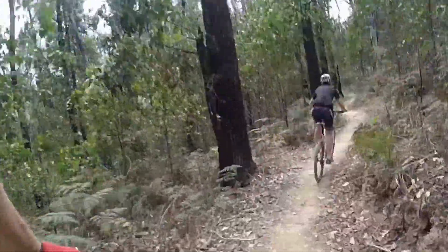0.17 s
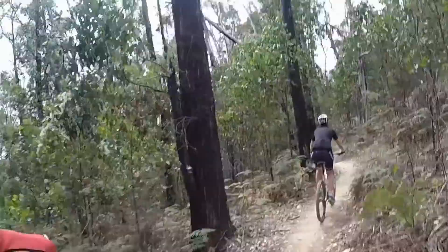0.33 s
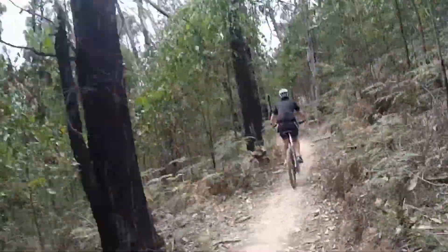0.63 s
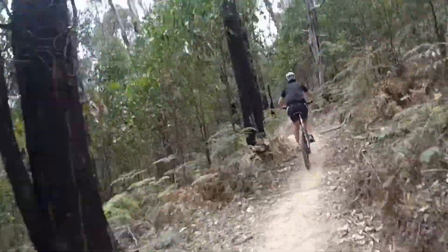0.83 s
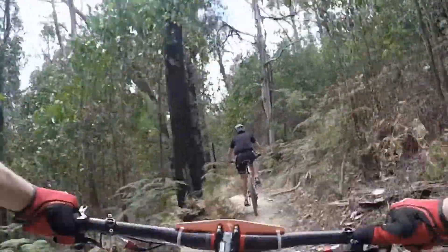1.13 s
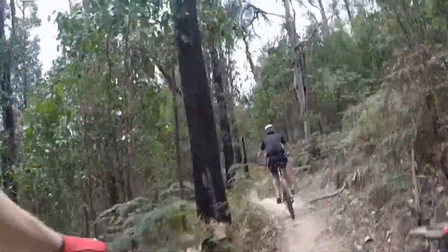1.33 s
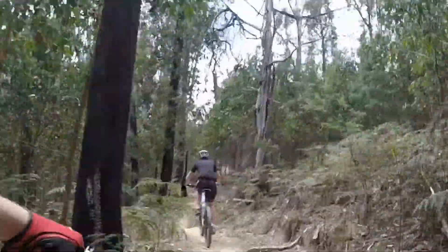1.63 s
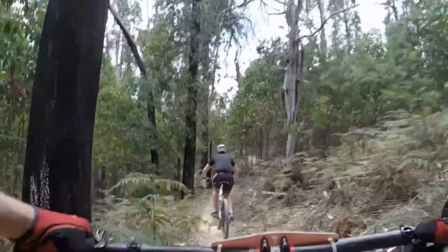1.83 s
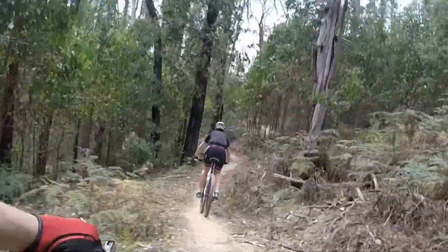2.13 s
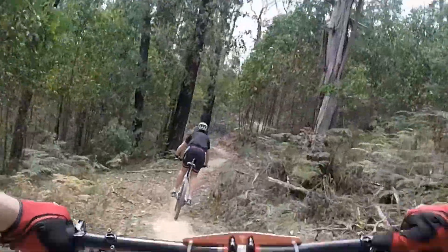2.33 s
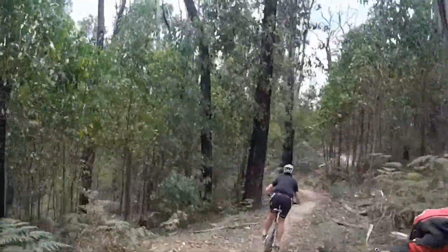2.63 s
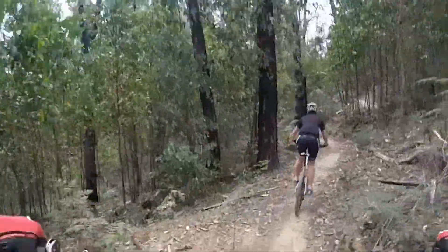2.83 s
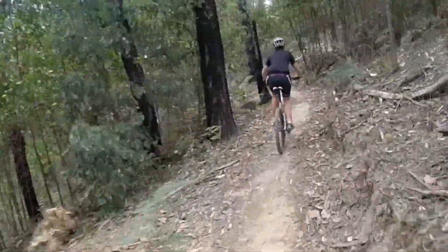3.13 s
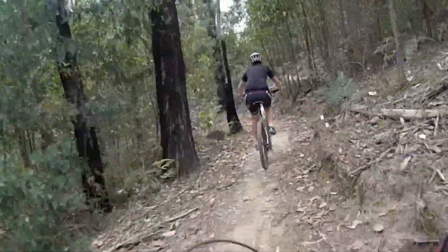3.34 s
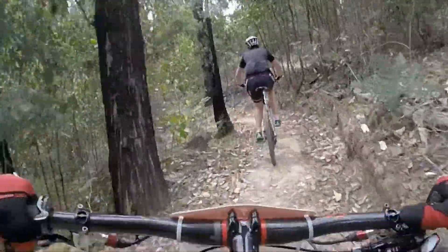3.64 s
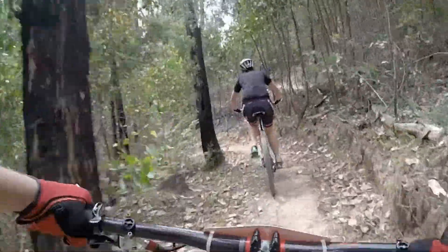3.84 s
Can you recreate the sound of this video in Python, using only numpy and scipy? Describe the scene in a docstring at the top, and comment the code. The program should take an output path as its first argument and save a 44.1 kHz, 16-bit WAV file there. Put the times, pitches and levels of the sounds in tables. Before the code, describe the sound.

A mountain bike rolls over dirt and leaves outdoors, picked up close and boxy by a cased chest microphone. Low shaking and wind rumble run throughout under faint tyre hiss and crackle. Ticks, scrapes and thuds cluster at 0.3-0.8 s; chain whir swells near 1 s, nearly vanishes from 1.6 to 2.8 s. A thump lands at 1.8 s; tyres and rattles surge at 3.3 s, bumps follow near 3.5 s, and the chain returns.

```python
"""The sound inside a case on a rider's chest along a forest trail, built from filtered noise and pulses.
From the start low shaking and the rumble of wind and frame fill the bass; tyres hiss and crackle on dirt and
leaves, the chain whirs and air hisses, these three coloured by the case resonances. Ticks, pressure bumps, strap
scrapes and damped knocks soon join; ticks and scrapes also pass the case resonances. The chain swells near
1 s, almost vanishes from 1.6 s to 2.8 s and returns towards the end, amid strong bumps near 3.5 s."""
import sys
import numpy as np
from scipy import signal
from scipy.fft import rfft, irfft
from scipy.io import wavfile
from scipy.ndimage import uniform_filter1d

SR = 44100
rng = np.random.default_rng(int(sys.argv[2]) if len(sys.argv) > 2 else 0)


def wav_out(sig):
    """Save sig, one row per channel (or a flat mono array), as 16-bit PCM at SR to the path in sys.argv[1]."""
    wavfile.write(sys.argv[1], SR, np.round(np.clip(np.atleast_2d(sig).T, -1, 1) * 32767).astype(np.int16))


def nominal_scale(level):
    """Amplitude ratio for a level in decibels (scalar or array-like)."""
    x = np.asarray(level, float) / 20
    return 10 ** x


N = 174195

# Resonances of the case: f/Hz, width/Hz, level/dB (lift; negative is a dip)
CASE_MODES = [(635, 55, 9.5), (1118, 170, 2.5), (1472, 240, 4.5), (2200, 320, 8), (2850, 205, 6),
              (3260, 270, -5.5), (3600, 293, 11), (4385, 90, 4.5), (5500, 170, 5.5), (6500, 380, 3.5)]
# Shaking, strength over time: t/s, level/dB
SHAKE_LEVEL = [(0, -45.5), (.3, -54), (.55, -49.5), (.75, -49.5), (1.0, -43.5), (1.5, -48), (1.9, -52),
               (2.3, -48), (2.7, -50.5), (3.0, -46), (3.4, -44.5), (3.7, -50.5), (3.95, -55.5)]
# Shaking, shape of spectrum: f/Hz, level/dB
SHAKE_COLOUR = [(3, -25.5), (8, -4), (24, -1), (33, -9.5), (60, -27.5), (100, -39), (1000, -150)]
# Wind and frame rumble, strength over time: t/s, level/dB
RUMBLE_LEVEL = [(0, -65.5), (.25, -64), (.55, -55), (.75, -65), (1.0, -59.5), (1.35, -60), (1.6, -62.5),
                (1.8, -57), (2.1, -65), (2.5, -64.5), (2.8, -62), (3.1, -62.5), (3.3, -55), (3.5, -58.5),
                (3.7, -64.5), (3.95, -62)]
# Wind and frame rumble, shape of spectrum: f/Hz, level/dB
RUMBLE_COLOUR = [(25, 1.5), (50, -8.5), (100, -5.5), (160, -14), (250, -14.5), (330, -25.5), (500, -26),
                 (900, -50), (2000, -76.5), (8000, -130)]
# Tyres on dirt and leaves, strength over time: t/s, level/dB
TYRE_LEVEL = [(0, -73.5), (.2, -70.5), (.45, -69.5), (.7, -71), (.95, -71), (1.2, -69), (1.45, -72.5),
              (1.7, -73.5), (1.85, -67), (2.1, -75.5), (2.3, -71), (2.55, -71), (2.75, -74), (3.0, -73.5),
              (3.3, -64), (3.5, -70), (3.75, -70.5), (3.95, -71.5)]
# Tyres, shape of spectrum before the case: f/Hz, level/dB
TYRE_COLOUR = [(200, -6), (400, -7), (1200, -3), (1600, -2.5), (2800, -5.5), (4000, -14), (5000, -13),
               (7000, -25.5), (7800, -32.5), (10000, -27.5), (14500, -48.5)]
# Chain, strength over time: t/s, level/dB
CHAIN_LEVEL = [(0, -68), (.15, -71), (.45, -72), (.62, -72.5), (.72, -72), (.9, -70), (1.0, -61),
               (1.1, -69), (1.2, -77), (1.6, -85.5), (2.8, -84), (3.0, -73.5), (3.25, -66.5), (3.6, -64.5),
               (3.75, -68.5), (3.95, -65)]
# Chain, shape of spectrum before the resonances: f/Hz, level/dB
CHAIN_COLOUR = [(800, -32), (1500, -21), (2200, -15.5), (2700, -1.5), (3600, -8.5), (5000, -14.5),
                (7000, -17.5), (7800, -29.5), (10000, -26.5), (12000, -20.5), (14500, -60)]
# Resonances of the metal drive: f/Hz, width/Hz, level/dB (lift)
CHAIN_MODES = [(2630, 180, 12), (6750, 350, 4), (8610, 300, 5), (10700, 220, 9), (11500, 160, 10),
               (12450, 300, 6)]
# Airstream hiss, shape of spectrum before the case: f/Hz, level/dB
AIR_COLOUR = [(1000, -13.5), (4000, -3), (7000, -12), (8000, -8.5), (12000, -14), (14500, -20)]
# Ticks of cable and twigs: t/s (start), level/dB (peak before filtering), f/Hz (centre), width/octaves
TICKS = [(.085, -58, 2980, 0.8), (.146, -57.5, 3600, 0.81), (.2718, -53.5, 2030, 1.8),
         (0.296, -51.5, 1850, 0.7), (0.392, -51, 2240, 0.84), (.426, -44.5, 2290, 0.43),
         (.565, -48.5, 3800, 2.4), (.595, -57, 6760, .3), (.663, -54.5, 2960, 1.43),
         (0.699, -51.5, 3380, 2.7), (0.7563, -46, 6450, 1.33), (.758, -57.5, 1920, 0.4),
         (.894, -59.5, 1800, .8), (0.94, -60.5, 1700, 0.68), (1.124, -55, 5400, 1.2),
         (1.291, -61, 7400, 1.4), (1.4445, -56, 3660, .5), (1.4448, -61, 7000, 1.3),
         (1.977, -55, 5940, 0.76), (2.176, -61, 1940, 1.9), (2.197, -58, 5500, 1.7), (2.21, -59, 3880, 1),
         (2.331, -60, 1910, 1.7), (2.364, -62, 2040, 2), (2.3838, -54.5, 1980, 1.3),
         (2.528, -63, 2200, 1.5), (2.721, -63.5, 1500, 1.6), (2.758, -62.5, 7000, 0.72),
         (2.788, -64.5, 1670, 0.57), (2.792, -66, 5740, .7), (2.856, -59.5, 2400, 2.1),
         (2.866, -58, 2600, 2.5), (3.049, -57, 5000, 1.9), (3.079, -62, 1720, 0.53),
         (3.2332, -56.5, 3600, 1), (3.259, -51, 1910, 1.5), (3.302, -45, 2380, 1.1),
         (3.334, -46.5, 2200, 1.45), (3.448, -46.5, 7000, 1.7), (3.45, -51.5, 2270, 1.3),
         (3.9175, -55.5, 3170, 1)]
# Filter on the ticks, before the case: f/Hz, level/dB
TICK_COLOUR = [(1000, 4), (2000, 1.5), (3600, 0), (7000, -4.5), (8500, -12), (11000, -6), (14000, -13)]
# Bumps: t/s (peak), level/dB (before factor and leak), length/s, signed factor (negative is a dip)
BUMPS = [(0.205, -30.5, 0.024, -0.64), (0.329, -34.5, 0.024, -0.81), (0.507, -32, 0.029, 1),
         (0.531, -33, 0.042, -1.66), (0.569, -32, 0.032, -0.8), (0.573, -22.5, 0.027, 0.64),
         (0.599, -30, 0.031, -0.89), (0.95, -35.5, 0.0309, -1.12), (1.126, -36.5, 0.041, -1.4),
         (1.214, -36.5, 0.034, -0.83), (1.374, -31, 0.035, -1.24), (1.498, -32, 0.043, -0.85),
         (1.593, -37, 0.068, -0.63), (1.786, -20, 0.032, -0.56), (1.805, -35.5, 0.022, 0.44),
         (1.916, -36, 0.034, -1.25), (2.101, -43.5, 0.043, -1.7), (2.41, -35, 0.04, -0.6),
         (2.625, -34.5, 0.035, 0.68), (2.654, -34.5, 0.048, -1.04), (3.466, -30.5, 0.028, 1),
         (3.484, -26, 0.026, -0.85), (3.601, -23, 0.033, -0.4), (3.699, -31, 0.034, -0.47)]
# Strap scrapes: t/s (start), length/s, level/dB (rms at full strength)
SCRAPES = [(.236, 0.028, -58), (0.274, 0.019, -59), (0.39, 0.024, -57), (0.405, 0.039, -49.5),
           (0.431, 0.089, -63.5), (0.52, 0.018, -58.5), (0.537, 0.042, -61.5), (0.87, 0.066, -69.5),
           (1.293, 0.04, -66.5), (1.35, 0.049, -70.5), (1.591, 0.021, -63.5), (1.65, 0.035, -64.5),
           (1.728, 0.042, -61), (1.769, 0.026, -57.5), (1.82, 0.034, -65), (1.907, 0.065, -65),
           (1.975, 0.037, -65.5), (2.168, 0.029, -72.5), (2.219, 0.01, -66.5), (2.35, 0.038, -74.5),
           (2.496, 0.11, -70), (2.687, 0.02, -72), (2.77, 0.011, -75), (2.859, .022, -64.5),
           (3.237, .06, -72), (3.297, 0.013, -55.5), (3.32, 0.031, -61.5), (3.387, 0.023, -62),
           (3.428, 0.044, -59.5), (3.544, 0.026, -64.5)]
# Scrapes, shape of spectrum before the resonances: f/Hz, level/dB
SCRAPE_COLOUR = [(150, 6.5), (300, 1), (550, -13), (1100, -7.5), (2200, -6), (3000, -5), (4300, -13),
                 (5000, -22), (7000, -22), (8500, -35.5), (11500, -37.5), (14500, -48.5)]
# Resonances of the strap: f/Hz, width/Hz, level/dB (lift; negative is a dip)
STRAP_MODES = [(670, 130, 3.5), (2200, 410, 0.5), (3600, 350, -7)]
# Knocks through the frame: t/s (start), level/dB (before damping), f/Hz (swing), level/dB (edge against swing)
KNOCKS = [(0.297, -40, 154, -7), (0.588, -34.5, 112, -29), (1.309, -39.5, 136, -27),
          (1.421, -35.5, 196, -8.5), (1.779, -37, 98, -32), (1.988, -38.5, 177, -13),
          (3.3, -53, 113.6, -20)]


def curve(table):
    """Amplitude envelope: levels in dB interpolated linearly over time."""
    table = np.array(table)
    return nominal_scale(np.interp(np.arange(N) / SR, table[:, 0], table[:, 1]))


def unit(x):
    """Normalisation: scale to rms 1."""
    return x / np.sqrt(np.mean(x ** 2))


def colour(x, points, modes=()):
    """Minimum-phase filtering: the cepstrum of a magnitude response, folded to be causal."""
    size = 2 ** 18
    hz = np.maximum(np.arange(size // 2 + 1) * SR / size, 1)
    points = np.array(points)
    db = np.interp(np.log(hz), np.log(points[:, 0]), points[:, 1])
    for centre_hz, width_hz, lift_db in modes:
        db = db + lift_db / (1 + (2 * (hz - centre_hz) / width_hz) ** 2)
    cepstrum = irfft(np.log(nominal_scale(db)))
    cepstrum[1:size // 2] *= 2
    cepstrum[size // 2 + 1:] = 0
    response = np.exp(rfft(cepstrum))
    return irfft(rfft(x, size) * response)[:N]


def walk(rate):
    """Random modulation: levels held for 1 / rate seconds, smoothed twice and scaled to rms 1."""
    hold = int(SR / rate)
    steps = np.repeat(rng.standard_normal(1000)[:N // hold + 1], hold)
    smooth = uniform_filter1d(uniform_filter1d(steps, hold), hold)
    return unit(smooth[:N])


def decay(t60_s):
    """Exponential decay: per-sample factor that loses 60 dB in t60_s."""
    return nominal_scale(-60 / (t60_s * SR))


def band(x, lo_hz, hi_hz):
    """Band-pass filtering: keep the range between two frequencies."""
    edges = [lo_hz, min(hi_hz, .45 * SR)]
    return signal.sosfilt(signal.butter(2, edges, "band", fs=SR, output="sos"), x)


def grains(per_s, spread_db):
    """Shot noise: random short decaying crackles, a few much larger than the rest."""
    chance, size, noise = rng.random(N), rng.exponential(size=N), rng.standard_normal(N)
    starts = (chance < per_s / SR) * nominal_scale(spread_db * np.minimum(size, 4))
    envelope = signal.lfilter([1], [1, -decay(.012)], starts)
    return unit(envelope * noise)


def flicker(x, lo_hz, count, own_db, rate):
    """Independent band modulation: each octave wavers in level on its own."""
    out = 0
    for k in range(count):
        octave = band(x, lo_hz * 2 ** k, lo_hz * 2 ** (k + 1))
        out = out + nominal_scale(own_db * walk(rate)) * octave
    return out


def shaking():
    """Amplitude-modulated noise: a low band wavers in level."""
    noise = rng.standard_normal(N) * nominal_scale(2.5 * walk(29.84))
    return curve(SHAKE_LEVEL) * unit(colour(noise, SHAKE_COLOUR))


def rumble():
    """Turbulent noise: gusts of wind and frame rumble modulate a bass spectrum, in common and by octave."""
    noise = rng.standard_normal(N) * nominal_scale(2.6 * walk(35))
    noise = flicker(noise, 29.9, count=5, own_db=.8, rate=25)
    return curve(RUMBLE_LEVEL) * unit(colour(noise, RUMBLE_COLOUR))


def tyres():
    """Rolling contact: dirt gives continuous noise, leaves give shot-like crackle; both waver together."""
    throb_db, grit_db = .9, 1.8  # slow and fast wavering
    dirt = rng.standard_normal(N)
    leaves = nominal_scale(-2) * grains(per_s=300, spread_db=2.6)
    rough = (dirt + leaves) * nominal_scale(throb_db * walk(20) + grit_db * walk(70))
    rough = flicker(rough, 297.8, count=6, own_db=.8, rate=15)
    return curve(TYRE_LEVEL) * unit(colour(rough, TYRE_COLOUR, CASE_MODES))


def chain():
    """Forced resonance: links seat on teeth at a nearly even rate and, with grit, ring the metal drive."""
    links_per_s, jitter, spread_db = 85, .15, 2.2  # jitter as a share of the interval
    chance = rng.standard_normal((int(1.5 * links_per_s * N / SR), 2))
    at = np.cumsum(SR / links_per_s * (1 + jitter * chance[:, 0])).astype(int)
    starts = np.zeros(N)
    starts[at[at < N]] = nominal_scale(spread_db * chance[at < N, 1])
    links = signal.lfilter([1], [1, -decay(.03)], starts) * rng.standard_normal(N)
    grit = rng.standard_normal(N) * nominal_scale(1.2 * walk(41))
    drive = grit + 1.1 * unit(links)
    drive = flicker(drive, 700, count=5, own_db=.6, rate=60)
    return curve(CHAIN_LEVEL) * unit(colour(drive, CHAIN_COLOUR, CASE_MODES + CHAIN_MODES))


def air():
    """Stationary noise: the airstream gives an even hiss, coloured by the case."""
    return nominal_scale(-90.5) * unit(colour(rng.standard_normal(N), AIR_COLOUR, CASE_MODES))


def ticks():
    """Impulsive excitation: brief decaying noise, band-limited about each centre, then coloured by the case."""
    t60_s, rise_s = .02, .0006
    t, out = np.arange(2048) / SR, np.zeros(N + 2048)
    envelope = nominal_scale(-60 * t / t60_s) * np.minimum(t / rise_s, 1)
    for s, db, hz, octaves in TICKS:
        half = 2 ** (octaves / 2)
        burst = band(rng.standard_normal(len(t)) * envelope, hz / half, hz * half)
        start = int(s * SR)
        out[start:start + len(t)] += burst / np.abs(burst).max() * nominal_scale(db)
    return colour(out[:N], TICK_COLOUR, CASE_MODES)


def bumps():
    """Pressure leakage: smooth swings in the case pass a high-pass filter, as slow pressure leaks away."""
    vent_hz = 4
    t, swing = np.arange(N) / SR, np.zeros(N)
    for s, db, length, factor in BUMPS:
        phase = np.pi * np.clip((t - s) / length, -.5, .5)
        swing += factor * nominal_scale(db) * np.cos(phase) ** 1.08
    return signal.sosfilt(signal.butter(2, vent_hz, "high", fs=SR, output="sos"), swing)


def scrapes():
    """Stick-slip friction: dense clicks and noise, in soft-edged rubs, excite the strap and case."""
    edge_s = .01
    t, envelope = np.arange(N) / SR, np.zeros(N)
    for s, length, db in SCRAPES:
        inside_s = np.minimum(t - s, s + length - t)
        envelope += nominal_scale(db) * np.clip(inside_s / edge_s + .5, 0, 1)  # half strength at start and end
    rub = rng.standard_normal(N) + 0.69 * grains(per_s=2000, spread_db=2.1)
    rub = rub * nominal_scale(2 * walk(120))
    modes = CASE_MODES + STRAP_MODES
    return colour(envelope * rub, SCRAPE_COLOUR, modes) / np.std(colour(rub, SCRAPE_COLOUR, modes))


def knocks():
    """Damped oscillation: a dull, short-lived swing, with a higher and faster-decaying edge at its onset."""
    decay_turns, rise_turns, edge_turns = .46, .025, .12  # time constants in cycles of the swing
    t, out = np.arange(N) / SR, np.zeros(N)
    for s, db, hz, edge_db in KNOCKS:
        turn = np.maximum(t - s, 0) * hz
        swing = np.sin(2 * np.pi * turn) * np.exp(-turn / decay_turns)
        out += nominal_scale(db) * swing * (1 - np.exp(-turn / rise_turns))
        out += nominal_scale(db + edge_db) * np.sin(2 * np.pi * 4.4 * turn) * np.exp(-turn / edge_turns)
    return out


def scene():
    """Superposition: all sources add in one channel."""
    low = bumps() + shaking() + rumble()
    contact = tyres() + chain() + scrapes() + ticks() + knocks()
    return (low + contact + air())[None]


def band_limit(x):
    """A steep low-pass at the top of the band."""
    return signal.sosfilt(signal.butter(12, 14300, fs=SR, output="sos"), x)


def record(dry):
    """Signal chain: the summed sources go to the final stage with no further gain."""
    return band_limit(dry)


dry = scene()
out = record(dry)
wav_out(out)
```